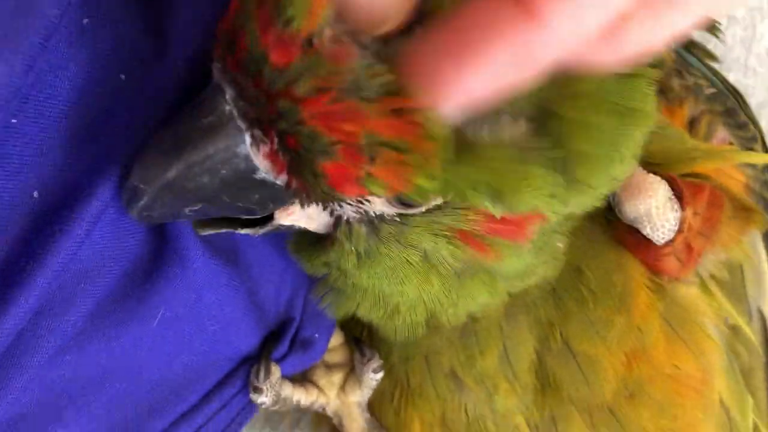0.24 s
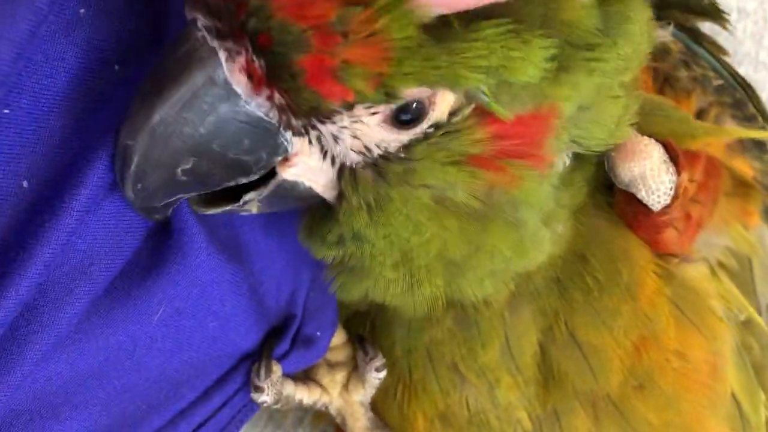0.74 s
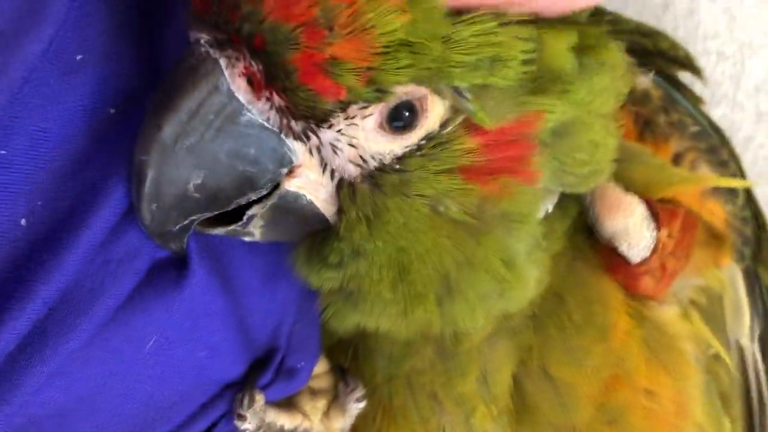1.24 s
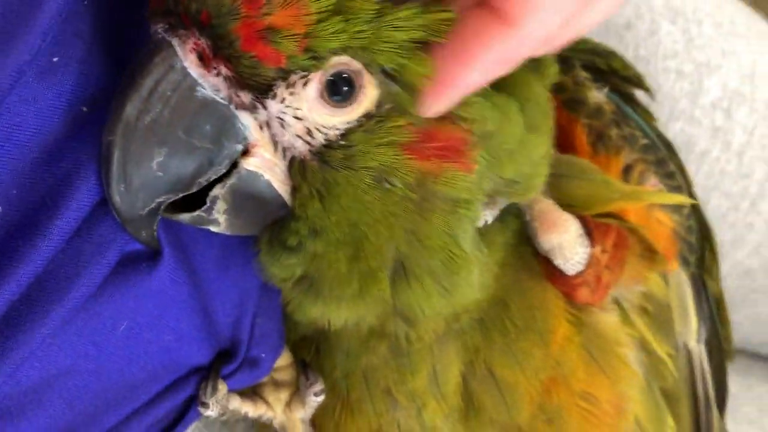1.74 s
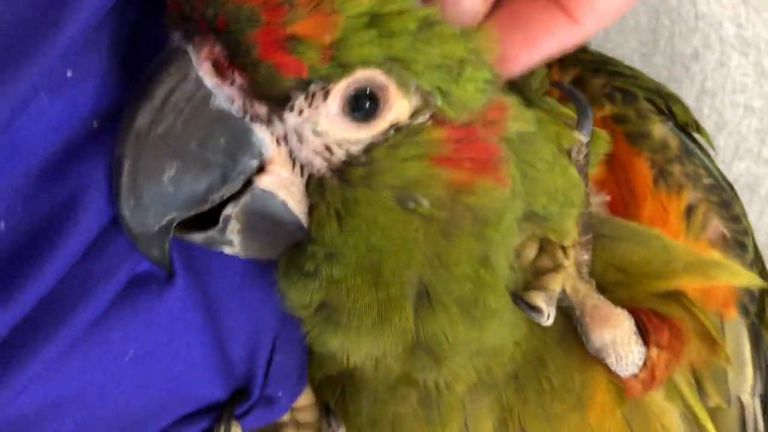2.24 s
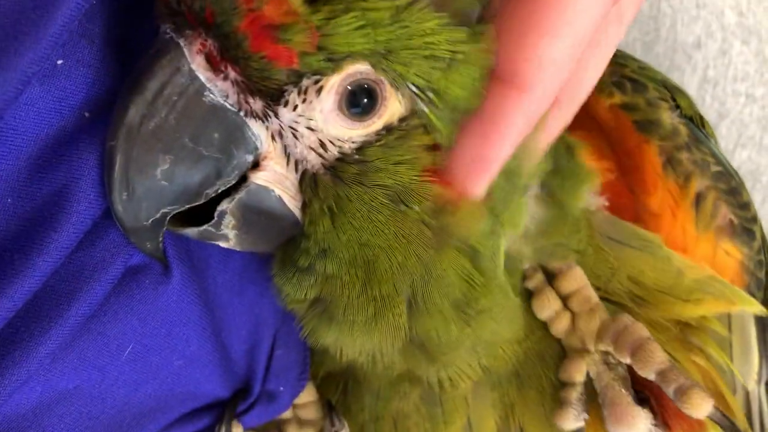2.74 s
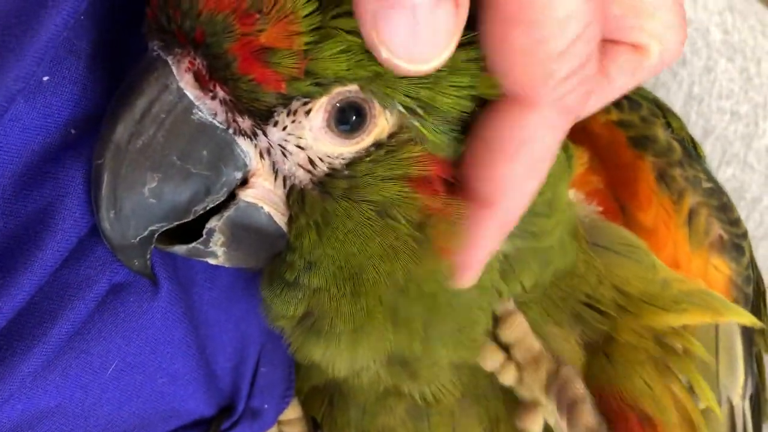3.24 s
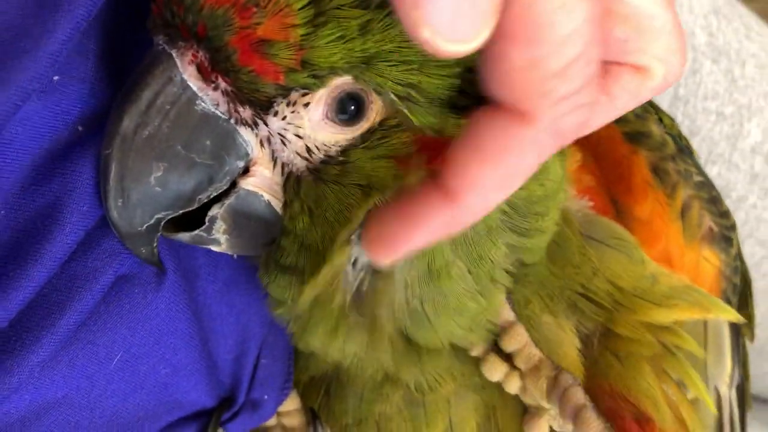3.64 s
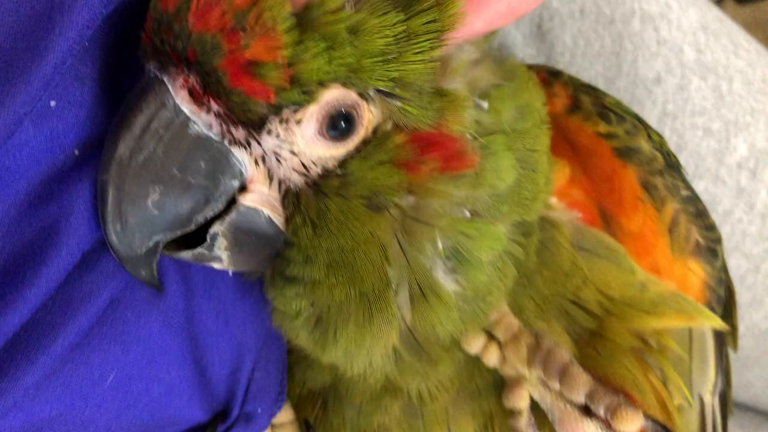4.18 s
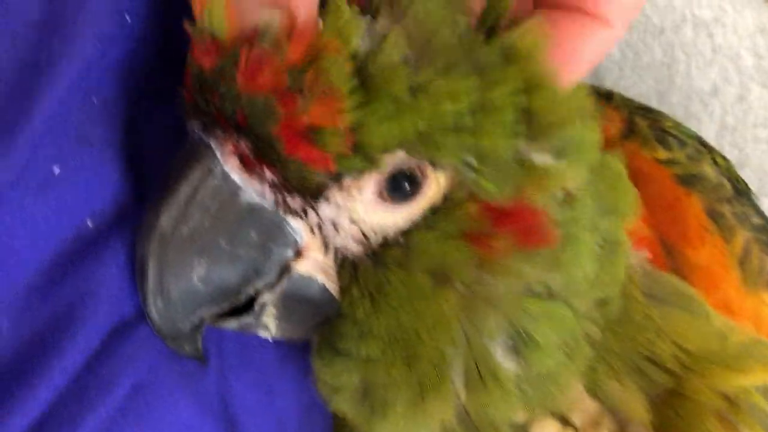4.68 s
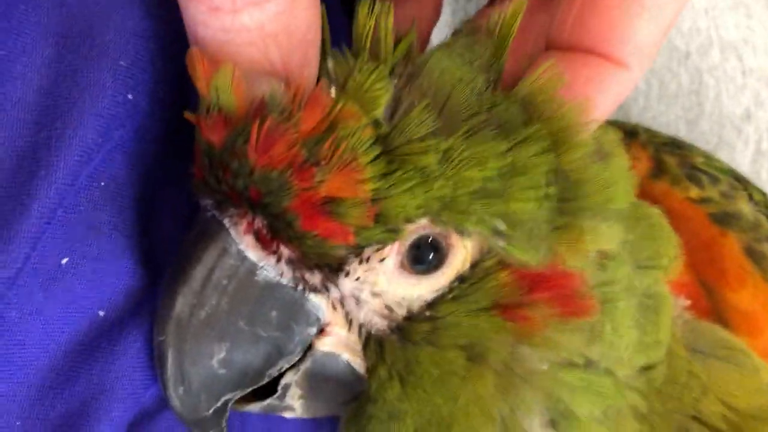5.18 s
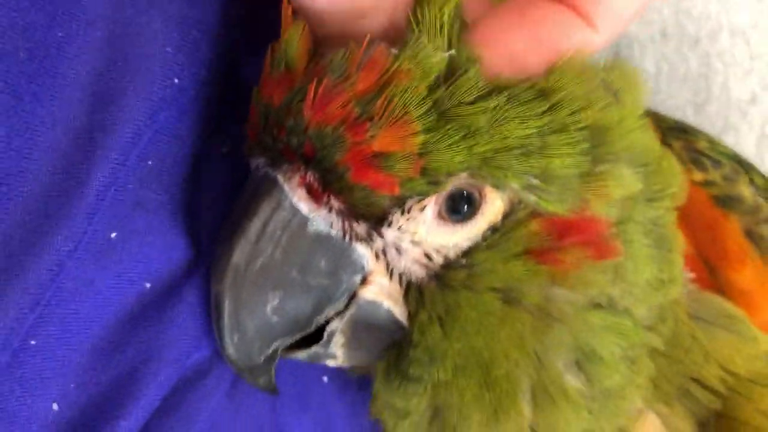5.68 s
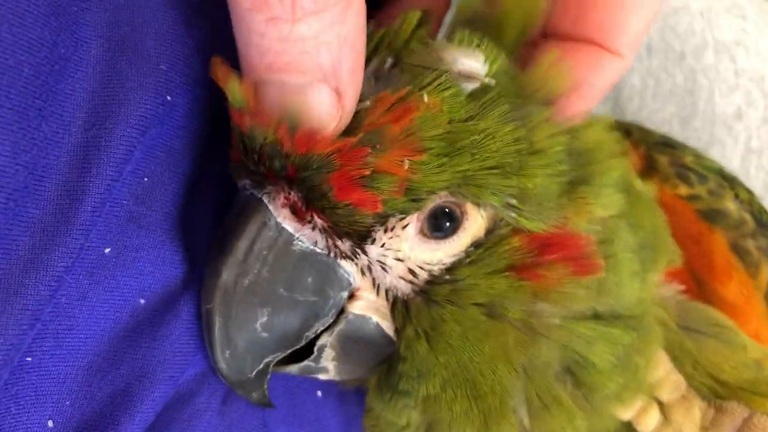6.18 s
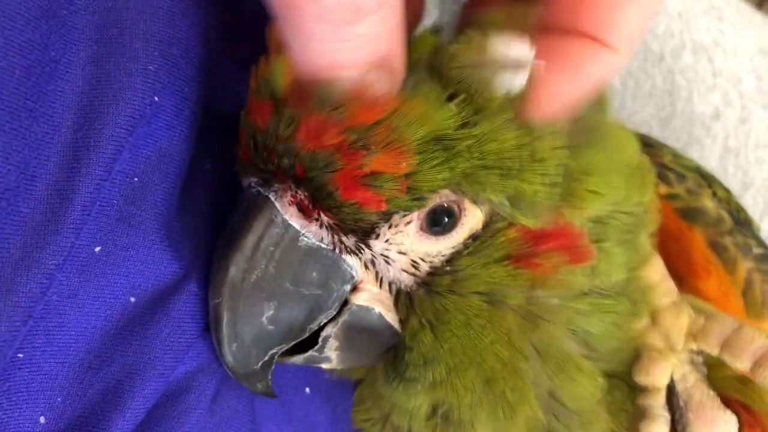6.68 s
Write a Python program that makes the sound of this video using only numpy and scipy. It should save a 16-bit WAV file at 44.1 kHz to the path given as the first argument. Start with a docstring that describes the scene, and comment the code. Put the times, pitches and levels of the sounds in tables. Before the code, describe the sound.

A young parrot is scratched on the head, its feathers swishing softly and its beak clicking near the microphone. Early on, a latch clicks across the room and a cupboard-like door knocks three times. Midway come a quiet peep, a sharp squeak and three loud, short squawks, each dropping from a high squeal to a lower note. Then only gentle rustles and dull bumps remain in the quiet, slightly echoing room.

```python
"""A young macaw has its head scratched in a quiet room: a thin peep, a squeak, three raspy falling squawks.
Its syrinx makes a stack of harmonics that breaks into puffs of air as the membrane turns rough.
Its hollow beak clicks softly, and its feathers rustle as the barbs slip under the fingers.
Further off something like a cupboard door is unlatched and knocks three times, over a faint mains hum."""
import sys
import numpy as np
from scipy import signal
from scipy.fft import rfft, irfft
from scipy.io import wavfile
from scipy.ndimage import uniform_filter1d

SR = 44100
rng = np.random.default_rng(int(sys.argv[2]) if len(sys.argv) > 2 else 0)


def inscribe(sig):
    """Save sig as 16-bit PCM at rate SR to the path in sys.argv[1].

    A 1-D sig is mono; a 2-D sig holds one channel per row.
    Samples are clipped to [-1, 1] before scaling.
    """
    pcm = np.round(np.clip(np.atleast_2d(sig).T, -1, 1) * 32767)
    wavfile.write(sys.argv[1], SR, pcm.astype(np.int16))


N = 305172
TOP_HZ = 15900  # ceiling of the harmonics and of the final low-pass

def gain_of(db):
    """Decibels to amplitude."""
    return 10 ** (np.asarray(db) / 20)

def unit_rms(x):
    """Scales to rms 1."""
    return x / np.sqrt(np.mean(x ** 2) + 1e-20)

def curve_at(points, hz):
    """Reads a curve on a log-frequency axis."""
    f, value = np.transpose(points)
    return np.interp(np.log(hz + 1), np.log(f + 1), value)

def track(events):
    """Lays (start_s, sound) pairs on one track."""
    mix = np.zeros(N)
    for start_s, sound in events:
        part = mix[round(start_s * SR):][:len(sound)]
        part += sound[:len(part)]
    return mix

def equalised(x, eq_db):
    """Applies an EQ, given as a function of frequency; rms 1."""
    hz = np.fft.rfftfreq(len(x), 1 / SR) + 1
    return unit_rms(irfft(rfft(x) * gain_of(eq_db(hz)), len(x)))

def wander(size, hz):
    """Random drift of rms 1, rolled off above hz."""
    return equalised(rng.standard_normal(size), lambda f: -10 * np.log10(1 + (f / hz) ** 4))

# Room tone EQ: freq_hz, gain_db
AIR_EQ = [(15, -36), (28, -22), (42, -3), (70, -2.5), (98, -1.5), (130, -1), (320, -2.5), (450, -7.5),
          (1100, -16), (2000, -18.5), (8900, -24), (16000, -25)]
def room_tone(air_db=-65.5, hum_db=-62.5, hum_hz=59.8):
    """Still room air and a slightly wavering mains hum."""
    hum = np.sqrt(2) * np.sin(2 * np.pi * hum_hz * np.arange(N) / SR) * (1 + 0.031 * wander(N, 4.6))
    air = equalised(rng.standard_normal(N), lambda f: curve_at(AIR_EQ, f))
    return gain_of(air_db) * air + gain_of(hum_db) * hum

# Feather EQ: freq_hz, gain_db
FEATHER_EQ = [(300, 9), (1000, 1.5), (3000, 3.5), (6000, 2.5), (10000, -1), (16000, -3)]
# Finger strokes through the feathers: start_s, length_s, level_db
FINGER_STROKES = [(0, 0.21, -57.5), (0.305, 0.69, -60), (1.09, 0.24, -63), (1.29, 2.5, -68),
                  (4.692, 0.498, -59), (5.46, 0.5, -68.5), (6.348, .65, -72.5)]
def feather_rustle(grain=0.32, clump=0.26, fade_s=0.1, resting_db=-77):
    """Feather barbs slip under the fingertips in small clumps, stroke by stroke."""
    t = np.arange(N) / SR
    power = gain_of(resting_db) ** 2
    for start_s, length_s, level_db in FINGER_STROKES:
        inside_s = np.minimum(t - start_s, start_s + length_s - t)
        power += gain_of(level_db) ** 2 * np.clip(inside_s / fade_s + .5, 0, 1)
    slips = rng.standard_normal(N) * np.exp(grain * wander(N, 1200) + clump * wander(N, 18))
    return np.sqrt(power) * equalised(slips, lambda f: curve_at(FEATHER_EQ, f))

def contact(start_s, level_db, centre_hz, width_octaves, t60_s, attack_share, grain=0.25):
    """A clump of tiny slips in one resonance; the longer the decay, the softer the attack."""
    t = np.arange(SR // 2) / SR
    slips = rng.standard_normal(len(t)) * np.exp(grain * wander(len(t), 1000))
    band = equalised(slips, lambda f: -40 * np.log10(1 + (np.log2(f / centre_hz) / width_octaves / 2) ** 2))
    attack = 1 - np.exp(-t / (attack_share * t60_s))
    return start_s, gain_of(level_db - 60 * t / t60_s) * attack * band

# Latch and handling hits: start_s, level_db, centre_hz, width_octaves, t60_s
LATCH_TAPS = [(0.146, -55, 1200, 0.96, 0.15), (0.446, -53.5, 1130, 0.87, 0.061),
              (0.547, -52.5, 745, 0.44, 0.16), (1.34, -35.5, 2460, 0.87, 0.084),
              (1.423, -47.5, 2430, 0.58, 0.29), (1.504, -43, 1350, 0.57, 0.28),
              (1.526, -44.5, 6200, 0.55, 0.05), (1.593, -38, 1560, 0.19, 0.28),
              (1.864, -36.5, 4630, 0.11, 0.051), (1.929, -40.5, 3360, 0.76, 0.012),
              (2.187, -50.5, 980, 1.12, 0.1), (2.601, -49, 3330, 1.03, 0.07),
              (3.059, -56, 3260, 0.86, 0.087), (6.061, -65, 2100, 0.56, 0.046)]
def latch_taps():
    """The latch and handled things click and scrape with a hard attack."""
    return track(contact(*row, attack_share=0.0049) for row in LATCH_TAPS)

# Low thuds: start_s, level_db, centre_hz, width_octaves, t60_s
SOFT_BUMPS = [(.15, -52, 156, 0.87, 0.25), (1.121, -52, 190, 0.41, 0.13), (1.424, -46.5, 536, 1, 0.25),
              (4.95, -62, 460, 0.57, 1), (5.06, -57, 207, 0.15, 0.33), (5.492, -56, 220, 0.53, 0.15),
              (6.553, -48.5, 334, 0.61, 0.056), (6.832, -48, 380, 0.8, 0.12)]
def soft_bumps():
    """Dull contacts with a rounded attack."""
    return track(contact(*row, attack_share=0.023, grain=0.26) for row in SOFT_BUMPS)

def ring(modes, t, spread_db=2.0):
    """Dying modes of a struck thing; every blow shares its force among them differently."""
    offsets_db = spread_db * rng.standard_normal(len(modes))
    return sum(gain_of(level_db + offset_db - 60 * t / t60_s) * np.sin(2 * np.pi * hz * t)
               for (hz, level_db, t60_s), offset_db in zip(modes, offsets_db))

# Modes of the hollow beak: pitch_hz, level_db, t60_s
BEAK_MODES = [(3650, 0, .007), (3150, -3, .006), (1900, -15, .008), (850, -21, .008)]
# Beak clicks: start_s, level_db
CLICKS = [(.543, -30), (1.302, -39), (2.187, -33), (3.662, -25.5), (6.879, -47), (6.914, -46)]
def beak_clicks(attack_s=.0007):
    """The mandibles slip past each other and the hollow beak rings briefly."""
    t = np.arange(SR // 10) / SR
    attack = 1 - np.exp(-t / attack_s)
    return track((start_s, gain_of(level_db) * attack * ring(BEAK_MODES, t, spread_db=1))
                 for start_s, level_db in CLICKS)

# Feather flicks: start_s, level_db, centre_hz, width_octaves, t60_s
FEATHER_FLICKS = [(0.598, -48.5, 5270, 0.53, 0.14), (0.895, -45.5, 4370, 1.06, 0.18),
                  (1.087, -55.5, 4900, 0.85, 0.097), (2.403, -50, 4700, 0.87, 0.22),
                  (2.896, -55, 3480, 1.4, 0.19), (2.968, -49, 5900, 0.73, 0.17),
                  (3.445, -53, 4660, 0.63, 0.091), (5.081, -48.5, 2280, 0.99, 0.26),
                  (5.951, -54, 3980, 1.6, 0.052), (6.329, -55.5, 3500, 0.51, .04),
                  (6.257, -47, 2120, 0.22, 0.14), (6.258, -52.5, 3070, 2.6, 0.22),
                  (6.647, -53.5, 4400, 1.6, 0.32), (6.647, -54, 6600, 0.064, 0.14),
                  (6.712, -55, 9000, 5.4, 0.43)]
def feather_flicks():
    """A finger flicks the feathers: brief, bright swishes."""
    return track(contact(*row, attack_share=0.022) for row in FEATHER_FLICKS)

# Door rattle EQ: freq_hz, gain_db
RATTLE_EQ = [(30, -19), (70, -4.5), (100, -10), (135, -1), (220, -1), (280, -1.5), (450, -3), (580, -7.5),
             (850, -9.5), (1100, -13.5), (1550, -9.5), (2300, -14.5), (5000, -19), (8000, -25.5),
             (16000, -43.5)]
# Modes of the door panel: pitch_hz, level_db, t60_s
PANEL_MODES = [(164, 10, 0.12), (215.2, 3.5, 0.45), (327, -4, 0.33), (496, -35, 0.13), (703, 1.5, 0.2),
               (872, 7, 0.1), (1370, -8, 0.26), (1590, -22, 0.18)]
# Door hits: start_s, level_db, tilt_db_per_octave, rattle_t60_s
DOOR_KNOCKS = [(1.580, -29.5, -0.5, 0.21), (1.863, -32, -0.94, 0.27), (2.22, -40, -1.5, 0.27)]
def door_knocks(panel_db=-14, seat_s=0.0081, first_touch=0.41):
    """The door touches, seats fully a moment later and rattles, while its panel rings."""
    t = np.arange(SR // 2) / SR
    seating = np.interp(t, [0, seat_s], [first_touch, 1])
    knocks = []
    for start_s, level_db, tilt, t60_s in DOOR_KNOCKS:
        noise = rng.standard_normal(len(t))
        rattle = equalised(noise, lambda f: curve_at(RATTLE_EQ, f) + tilt * np.log2(f / 500))
        decay = gain_of(-60 * np.maximum(t - seat_s, 0) / t60_s)
        panel = gain_of(panel_db) * ring(PANEL_MODES, t)
        knocks.append((start_s, gain_of(level_db) * seating * (rattle * decay + panel)))
    return track(knocks)

# Throat and beak EQ on the tone: freq_hz, gain_db
TONE_EQ = [(300, -55), (900, -45), (1500, -5), (2300, 0.5), (3200, 6), (4100, 7), (4900, -3.5), (6400, 0.5),
           (7300, -10), (8200, -1), (10000, -11.5), (11600, -13), (13200, -23.5), (15500, -28.5)]
# Throat and beak EQ on the rasp: freq_hz, gain_db
RASP_EQ = [(300, -28.5), (900, -15.5), (1400, -6.5), (2200, 8), (3000, 5.5), (3700, -2), (4800, 4.5),
           (7000, 0), (9000, -6), (12000, -14.5), (15500, -28.5)]
def syrinx(effort_db, pitch_hz, rough, tone_tilt, rasp_tilt=0, croak_db=0, breath=0.3):
    """A clear stack of harmonics turns into a chaotic rasp as rough goes from 0 to 1.
    Tilts are in dB per octave; croak_db opens or shuts a low throat resonance."""
    size, rough = len(pitch_hz), np.clip(rough, 0, 1)
    # the pitch wavers, and a rough membrane keeps its period less and less well
    waver = (.005 + .02 * rough) * wander(size, 130)
    jitter = (.003 + .135 * rough ** 2) * wander(size, 650)
    phase = 2 * np.pi * np.cumsum(pitch_hz * (1 + waver + jitter)) / SR
    harmonic = np.arange(1, 11)[:, None]
    pulses = (np.sin(harmonic * phase) * (harmonic * pitch_hz < TOP_HZ)).sum(0)
    tone = equalised(pulses, lambda f: curve_at(TONE_EQ, f) + tone_tilt * np.log2(f))
    # level the tone, wherever the harmonics fall in the throat
    tone /= np.sqrt(uniform_filter1d(tone ** 2, size=400) + 1e-9)
    tone *= unit_rms(np.exp(0.27 * wander(size, 100)))  # shimmer
    # air escapes in puffs, once a cycle and in irregular slaps
    slaps = np.exp(0.33 * wander(size, 270))
    puffs = rng.standard_normal(size) * (1 + np.cos(phase) / 2) * slaps
    croak = lambda f: croak_db * np.exp(-(np.log2(f / 860) / 0.97) ** 2)
    rasp = equalised(puffs, lambda f: curve_at(RASP_EQ, f) + rasp_tilt * np.log2(f) + croak(f))
    voice = ((1 - rough) * tone + breath * rough * rasp) / np.hypot(1 - rough, breath * rough)
    return gain_of(effort_db) * voice * signal.windows.tukey(size, .04)

FADE_DB = -23.5  # depth of each note's attack and release
def envelope_db(t, attack_s, release_s=0.024):
    """Attack, hold and release of a note."""
    attack = np.maximum(1 - t / attack_s, 0) ** 2
    release = np.maximum(1 - (t[-1] - t) / release_s, 0) ** 2
    return FADE_DB * (attack + release)

# Pitch bend of the peep, a dip and a recovery: time_s, pitch_hz
PEEP_BEND = [(3.722, 2680), (3.745, 2347), (3.766, 2240), (3.808, 2470), (3.85, 2400)]
def peep(level_db=-47, fade_db_per_s=43.5):
    """A quiet, nearly pure note that slowly fades."""
    time_s, pitch_hz = np.transpose(PEEP_BEND)
    t = np.arange(0, time_s[-1] - time_s[0], 1 / SR)
    effort_db = level_db - fade_db_per_s * t + envelope_db(t, attack_s=0.013)
    bend_hz = np.interp(time_s[0] + t, time_s, pitch_hz)
    return time_s[0], syrinx(effort_db, bend_hz, rough=.26, tone_tilt=-1.3)

def squeak(start_s=3.853, crack_s=3.885, end_s=3.918, level_db=-29, held_hz=3155, fall_hz=302.7):
    """A piercing note: the pitch falls as it swells, until the voice cracks into a fading rasp."""
    t = np.arange(0, end_s - start_s, 1 / SR)
    clean_s = crack_s - start_s
    cracked = (1 + np.tanh((t - clean_s) / .002)) / 2
    swell_db = FADE_DB * np.maximum(1 - t / 0.031, 0)
    effort_db = level_db + swell_db - 1.5 * cracked + envelope_db(t, attack_s=.005)
    pitch_hz = held_hz + fall_hz * np.maximum(1 - t / clean_s, 0) ** 2
    rough = .17 + .4 * cracked
    return start_s, syrinx(effort_db, pitch_hz, rough, tone_tilt=4, croak_db=11.5, breath=.5)

def squeal(start_s, end_s, level_db, swell_s, top_hz, fall_share):
    """The high opening of a squawk: it swells out of a throaty rasp and slips down in pitch halfway."""
    t = np.arange(0, end_s - start_s, 1 / SR)
    slip = (1 + np.tanh((t / t[-1] - 0.49) / 0.11)) / 2
    pitch_hz = top_hz * (1 - fall_share * slip)
    rough = np.interp(t, [0, 0.056], [1, 0.39])
    effort_db = level_db + envelope_db(t, swell_s)
    return start_s, syrinx(effort_db, pitch_hz, rough,
                           tone_tilt=-3.5, rasp_tilt=-1.7, croak_db=5.5, breath=0.32)

def low_note(start_s, end_s, level_db, break_hz, held_hz, glide_s, held_rough, push_db,
             sag_hz_per_s=310, clear_s=.062, droop_s=.015):
    """The body of a squawk: it glides down and clears, then droops and roughens after a last push of air."""
    t = np.arange(0, end_s - start_s, 1 / SR)
    left_s = t[-1] - t
    droop = np.exp(-(left_s / droop_s) ** 2)
    glide_hz = (break_hz - held_hz) * np.exp(-(t / glide_s) ** 2)
    pitch_hz = held_hz * (1 - 0.12 * droop) + glide_hz - sag_hz_per_s * (t - t.mean())
    rough = held_rough + (.6 - held_rough) * np.exp(-(t / clear_s) ** 4) + .42 * droop
    push = np.exp(-((left_s - 0.026) / 0.0033) ** 2)
    effort_db = level_db + push_db * push + envelope_db(t, attack_s=0.023)
    return start_s, syrinx(effort_db, pitch_hz, rough,
                           tone_tilt=0.5, rasp_tilt=1.6, croak_db=-11.5, breath=.2)

# Squawks: start_s, break_s, end_s, level_db, swell_s, squeal_hz, fall_share,
# then the low note's shape: break_hz, held_hz, glide_s, held_rough (0-1), push_db
SQUAWK_CUES = [(4.146, 4.209, 4.35, -27, 0.042, 3288, 0.17, 2150, 1660, 0.021, .11, 3),
               (4.433, 4.478, 4.61, -28, 0.027, 3290, 0.041, 2190, 1590, 0.027, 0.1, 7),
               (4.706, 4.743, 4.895, -28.5, 0.02, 3518, 0.0276, 2364, 1597, .034, 0.38, -3.5)]
def squawks(squeal_trim_db=-2.5, overlap_s=.032):
    """Each squawk is a high squeal that breaks into a lower, slightly louder note."""
    notes = []
    for start_s, break_s, end_s, level_db, swell_s, squeal_hz, fall_share, *shape in SQUAWK_CUES:
        squeal_db = level_db + squeal_trim_db
        notes.append(squeal(start_s, break_s + overlap_s, squeal_db, swell_s, squeal_hz, fall_share))
        notes.append(low_note(break_s, end_s, level_db, *shape))
    return track(notes)

# Reverb time by band: freq_hz, t60_s
ROOM_DECAY = [(100, 0.459), (300, 0.55), (800, 0.46), (2000, 0.32), (4000, 0.34), (8000, 0.3),
              (15000, 0.16)]
def room_reverb(send):
    """Sparse reflections of random sign, each band dying at its own speed."""
    reflections = np.zeros(SR)
    slots = np.arange(180, SR - 20, 20)
    reflections[slots + rng.integers(0, 20, len(slots))] = rng.choice([-1., 1.], len(slots))
    hz, t, bands = signal.stft(reflections, SR, nperseg=256)
    decay = gain_of(-60 * t / curve_at(ROOM_DECAY, hz)[:, None])
    tail = signal.istft(bands * decay, SR, nperseg=256)[1]
    return signal.fftconvolve(send, tail / np.linalg.norm(tail))[:N]

def scene():
    """Mono mix: bird and fingers close up, the door across the room."""
    voice = track([peep(), squeak()]) + squawks()
    near = beak_clicks() + feather_flicks()
    far = latch_taps() + soft_bumps() + door_knocks()
    direct = voice + near + gain_of(4) * far
    reverb = room_reverb(gain_of(-4) * voice + gain_of(-6.5) * near + gain_of(-2.5) * far)
    return (direct + reverb + feather_rustle() + room_tone())[None]

def record(dry):
    """A steep low-pass trims the very top of the mix."""
    low_pass = signal.firwin(511, TOP_HZ, window=("kaiser", 9), fs=SR)
    return signal.oaconvolve(dry, low_pass[None], "same")

dry = scene()
out = record(dry)
inscribe(out)
```